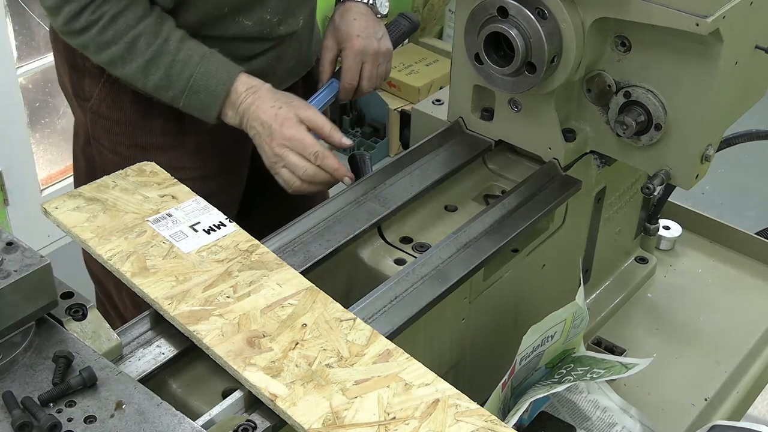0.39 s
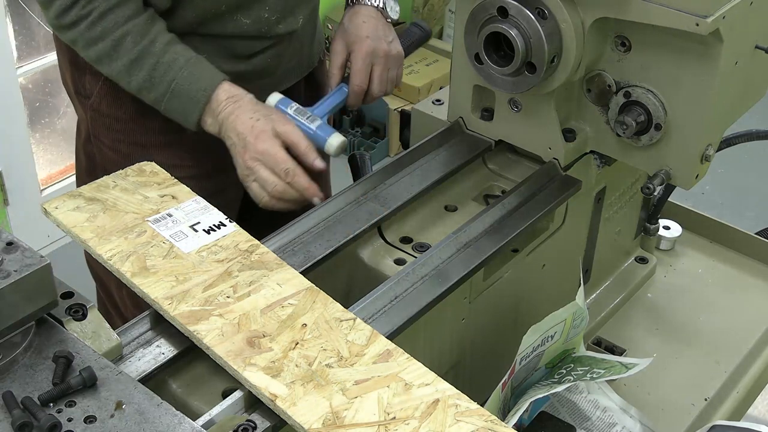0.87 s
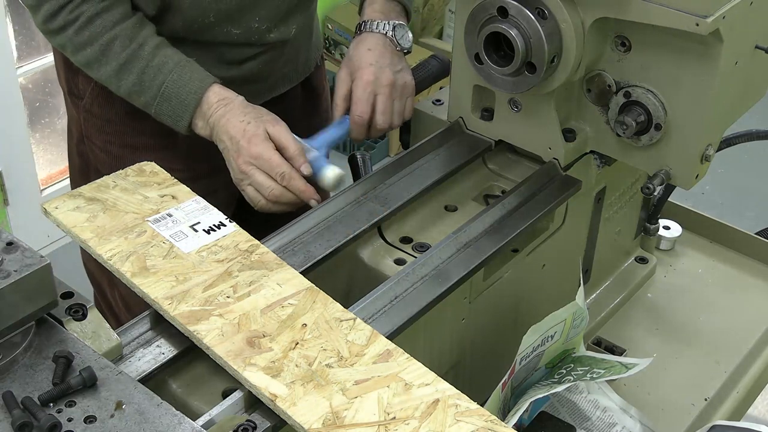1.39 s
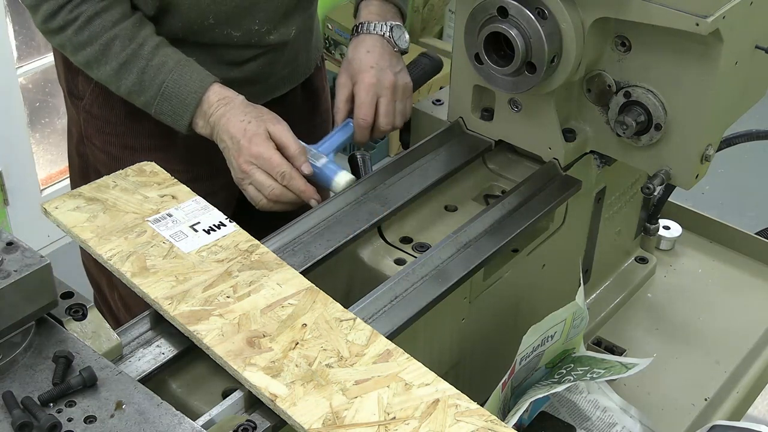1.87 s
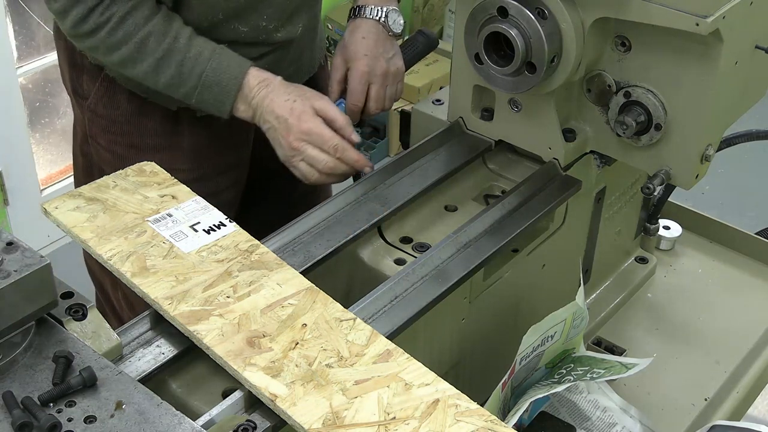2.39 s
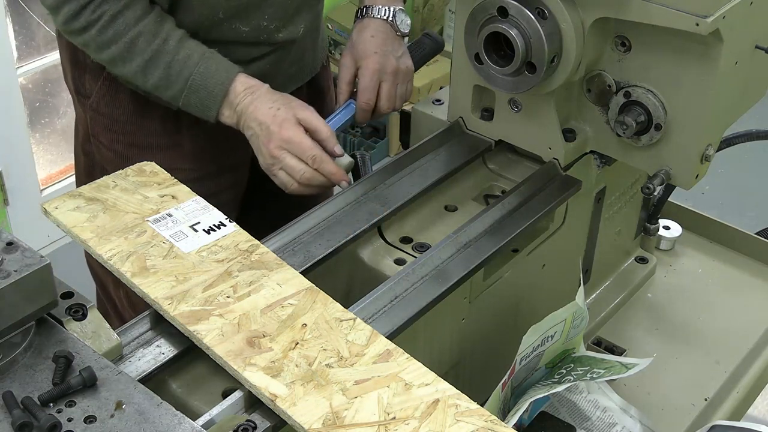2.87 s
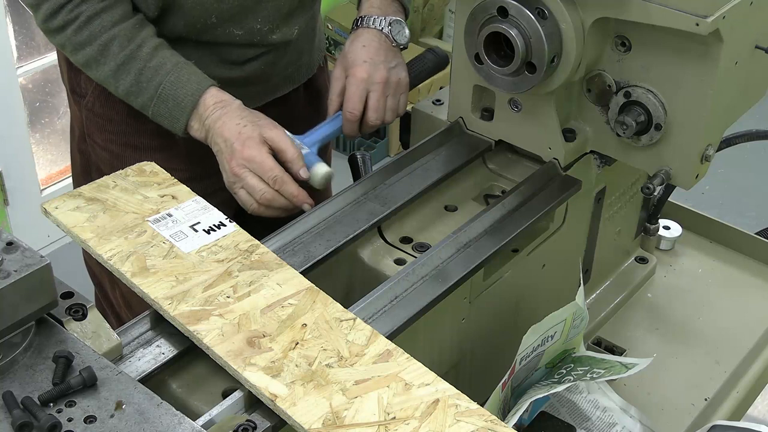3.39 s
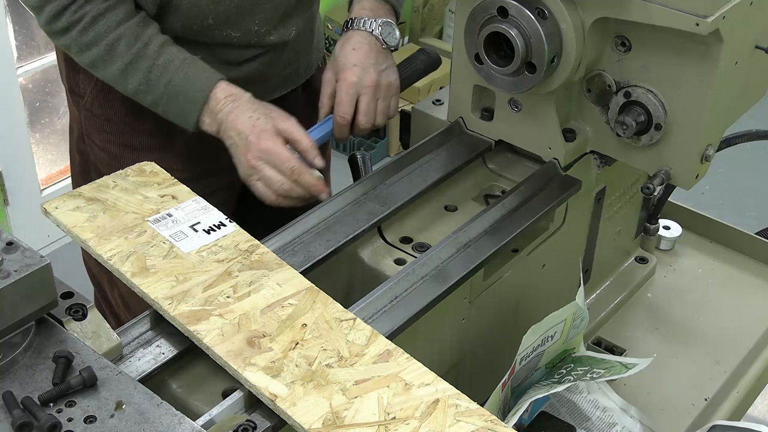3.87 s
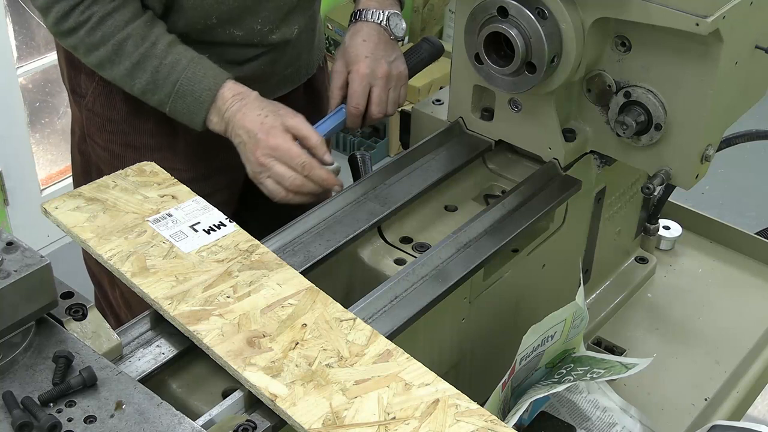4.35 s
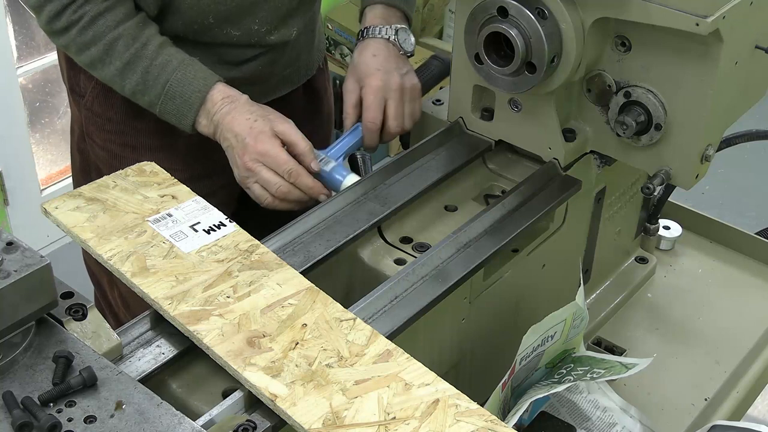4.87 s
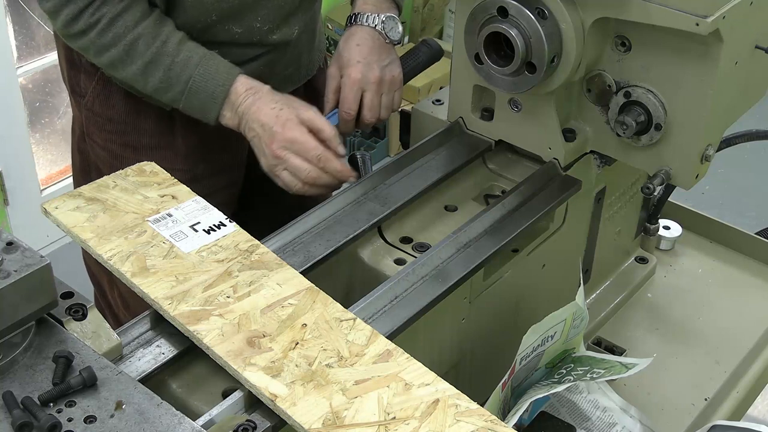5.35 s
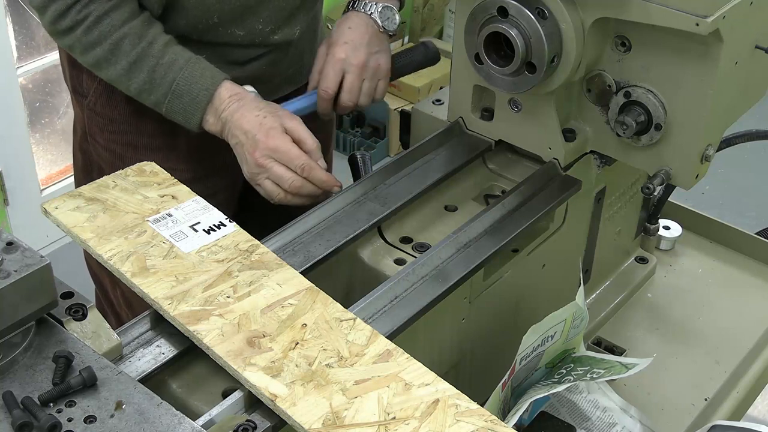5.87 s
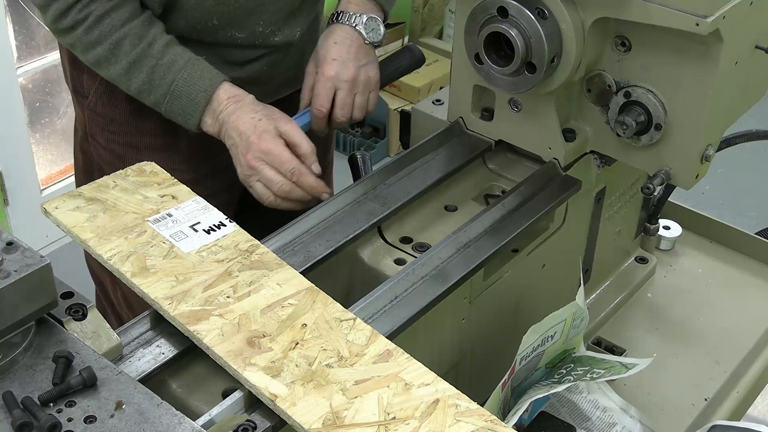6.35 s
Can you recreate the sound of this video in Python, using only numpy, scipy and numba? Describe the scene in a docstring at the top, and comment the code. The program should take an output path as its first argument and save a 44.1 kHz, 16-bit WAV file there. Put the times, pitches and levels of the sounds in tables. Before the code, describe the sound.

A plastic-faced mallet hits a heavy iron machine part five times in a small quiet workshop. After a pause come two quick blows, then three more well spaced ones, each a dull hard knock with a short iron clank and brief room echo. Faint handling ticks fall between them over soft room air and a low wavering hum. Close stereo microphones.

```python
"""Five mallet blows with a plastic face on a heavy iron machine part, in a small, quiet workshop,
heard by a close pair of microphones. Each blow is echoing noise and decaying iron modes, softened by the face;
the camera's limiter holds down the loud blows. Small ticks of handling are enveloped noise.
Behind them lies room air, as coloured noise, with narrow noise bands for a low wavering hum and,
from 388 Hz up, resonances of the room air."""
import sys
import numpy as np
from scipy import signal
from scipy.fft import rfft, irfft
from scipy.io import wavfile
from scipy.ndimage import uniform_filter1d, minimum_filter1d
from numba import njit

SR = 44100
rng = np.random.default_rng(int(sys.argv[2]) if len(sys.argv) > 2 else 0)


def volts(x):
    """Linear amplitude factor 10**(x/20) for a level x in dB, scalar or array-like."""
    e = np.asarray(x, float) / 20
    return 10 ** e


def waveform_to_disk(signal):
    """Save audio, clipped to [-1, 1], as 16-bit WAV at the path in sys.argv[1]."""
    frames = np.transpose(np.atleast_2d(signal))
    scaled = np.clip(frames, -1, 1) * 32767
    samples = np.round(scaled).astype(np.int16)
    wavfile.write(sys.argv[1], SR, samples)


N = 286280
TIME = np.arange(N) / SR


def at(table, hz):
    """Read a (frequency, value) table on a log-frequency axis."""
    f, v = np.transpose(table)
    return np.interp(np.log(np.maximum(hz, 1)), np.log(f), v)


def colour(x, *tables):
    """Shape a spectrum by the sum of (frequency [Hz], level [dB]) tables."""
    hz = np.fft.rfftfreq(x.shape[-1], 1 / SR)
    gain = volts(sum(at(table, hz) for table in tables))
    return irfft(rfft(x) * gain, x.shape[-1])


def unit(x):
    """Scale to rms 1."""
    return x / np.sqrt(np.mean(x ** 2))


def pair(mid, side):
    """Left and right from mid and side."""
    return np.array([mid + side, mid - side])


def add(out, x, s):
    """Mix x into out from second s on."""
    i = int(s * SR)
    out[..., i:i + x.shape[-1]] += x[..., :out.shape[-1] - i]


# mallet blows; the last two columns depend on the spot that is hit, a higher corner is shorter and brighter:
# (time [s], strength [dB], contact corner [Hz], iron ring [dB], lift of the clank [dB])
BLOWS = [(1.527, -4.5, 1610, -13.5, -2.2), (1.83, -2.5, 1730, -12, -3), (3.6718, -2.5, 1880, -11.5, 0.5),
         (4.9312, -0.5, 2280, -14, 1.3), (6.0910, 2.5, 2760, -13.5, -0.5)]
NEW_ECHOES = 0.6  # weight of fresh noise in the echo pattern of each blow
CLANK_HZ = 970


def mallet():
    """Each blow rings the iron and the room; the hands shift, so the echo pattern changes from blow to blow."""
    out = np.zeros((2, N))
    phase = 2 * np.pi * rng.random((2, len(IRON), 1))
    white = rng.standard_normal((2, SR))
    casting = casting_humps()
    for s, strength_db, contact_hz, spot_db, clank_db in BLOWS:
        fresh = rng.standard_normal((2, SR))
        white = np.sqrt(1 - NEW_ECHOES ** 2) * white + NEW_ECHOES * fresh
        source = iron_ring(phase, spot_db) + room_knock(white, casting)
        source[0] += crack()
        # the plastic face pushes for a while instead of clicking: treble falls above the contact corner
        push = signal.butter(2, contact_hz, fs=SR, output="sos")
        knock = signal.sosfilt(push, pair(*source))
        knock += (volts(clank_db) - 1) * signal.lfilter(*signal.iirpeak(CLANK_HZ, 1.3, SR), knock)
        add(out, volts(strength_db) * (knock + stand()), s)
    return out


# modes of the struck iron: (frequency [Hz], relative level [dB], decay by 60 dB [s])
IRON = [(207, -16, .7), (260, -21, .9), (288, -9, .3), (374, -8, .47), (479, -8, .4), (511, -4, .31),
        (538, -5, .35), (563, -3, .42), (600, -3, .26), (630, -5, .31), (686, -7, .42), (759, -7, .38),
        (789, -7, .4), (813, -7, .36), (907, -7, .31), (947, -5, .32), (1034, -3, .25), (1085, -2, .36),
        (1112, -4, .33), (1227, -2, .24), (1305, -4, .26), (1354, -3, .28), (1400, 0, .3), (1418, -1, .28),
        (1558, -6, .25), (1785, -7, .32), (1833, -8, .33), (2038, -9, .33), (2231, -7, .3), (2266, -7, .3)]
IRON_SCATTER_DB, IRON_DETUNE = 3, 0.003  # spread from blow to blow: level, share of the frequency
IRON_WAVER_DB = 3.5  # spread of the steps before they are smoothed


def iron_ring(phase, spot_db):
    """Iron modes as decaying sines, in mid and side."""
    t = TIME[:SR]
    hz, mode_db, t60 = np.transpose(IRON)[:, :, None]
    scatter, detune = rng.standard_normal((2, *hz.shape))
    # echoes interfere with each mode, so its level wavers as it dies
    steps = np.repeat(rng.standard_normal((len(hz), SR // 1050)), 1050, axis=1)
    waver = uniform_filter1d(steps, size=1050)
    ring_db = spot_db + mode_db + IRON_SCATTER_DB * scatter + IRON_WAVER_DB * waver - 60 * t / t60
    sines = np.sin(2 * np.pi * hz * (1 + IRON_DETUNE * detune) * t + phase)
    width = volts([0 * hz, at(KNOCK_SIDE, hz)])
    modes = width * build(hz, t) * volts(ring_db) * sines
    return modes.sum(axis=1)


CRACK_HZ, CRACK_DB, CRACK_T60_S, CRACK_LATE_S = 1980, 1, 0.018, 0.00105  # level before the contact filter


def crack():
    """The face bites: a short bright sine just after the first touch."""
    since = np.maximum(TIME[:SR] - CRACK_LATE_S, 0)
    fade = volts(CRACK_DB - 60 * since / CRACK_T60_S)
    return fade * build(CRACK_HZ, since) * np.sin(2 * np.pi * CRACK_HZ * since)


STAND_HZ, STAND_DB, STAND_S, STAND_LATE_S = 62.9, -54, 0.06, 0.11  # level before the blow's strength


def stand():
    """The machine's stand answers late with a low sway that swells and dies."""
    t = TIME[:SR]
    sway = np.maximum(t - STAND_LATE_S, 0) / STAND_S
    return volts(STAND_DB) * sway ** 2 * np.exp(2 - 2 * sway) * np.sin(2 * np.pi * STAND_HZ * t)


# crowded resonances of the casting: (frequency [Hz], half-width to 1/e [Hz], lift [dB])
HUMPS = [(560, 80, 4), (800, 70, 3), (1070, 70, 4), (1350, 110, 5), (1820, 60, 4), (2040, 50, 3),
         (2300, 70, 3), (2800, 90, 3), (3150, 120, 2), (3600, 220, 2), (3950, 120, 2), (4750, 200, 2),
         (5400, 150, 2)]


def casting_humps():
    """Crowded upper modes merge into broad humps, as a (frequency [Hz], lift [dB]) table."""
    grid = np.geomspace(100, 9000, num=600)
    lift = sum(db * np.exp(-((grid - f) / w) ** 2) for f, w, db in HUMPS)
    return np.transpose([grid, lift])


# colour of the knock in the room: (frequency [Hz], relative level per Hz [dB])
KNOCK = [(30, -42), (60, -50), (100, -42), (150, -22.5), (300, -13), (550, -8), (1000, -7), (1450, -3),
         (1600, -4.5), (2500, -6), (3600, -7), (5500, -13), (8400, -10.5), (9800, -55)]
# side against mid of the knock at the close microphone pair: (frequency [Hz], level [dB])
KNOCK_SIDE = [(60, -41), (180, -35.5), (320, -31.5), (560, -12), (990, -8), (1730, -5), (3040, -6),
              (5320, -3.5), (7500, -10), (9320, -25.5)]


def room_knock(white, casting):
    """The room carries the knock: noise coloured by knock and casting, made into echoes in mid and side."""
    mid = colour(white[0], KNOCK, casting)
    side = colour(white[1], KNOCK, casting, KNOCK_SIDE)
    return echoes(np.array([mid, side]) / mid.std())


# room decay: (frequency [Hz], decay by 60 dB [s])
ROOM_T60 = [(60, 0.43), (150, 0.69), (300, 0.37), (600, 0.32), (1200, 0.29), (2500, 0.26), (5000, 0.26),
            (9000, 0.17)]
# late tail against the early room: (frequency [Hz], level [dB])
LATE = [(200, -7.5), (400, -18), (700, -19.5), (1500, -35.5), (4000, -41)]
LATE_T60_S = 0.86


def echoes(noise):
    """Dense reflections: half-octave bands of noise, each dying at the room's rate."""
    t = TIME[:noise.shape[-1]]
    hz = np.maximum(np.fft.rfftfreq(len(t), 1 / SR), 1)
    spectrum, out = rfft(noise), 0
    for centre in 30 * 2 ** np.arange(0, 9, 0.5):
        share = np.clip(1 - 2 * np.abs(np.log2(hz / centre)), 0, 1)
        band = irfft(spectrum * share, len(t))
        early = volts(-60 * t / at(ROOM_T60, centre))
        # a weaker, slower tail comes back from the far end of the shop
        late = volts(at(LATE, centre) - 60 * t / LATE_T60_S)
        out = out + band * build(centre, t) * (early + late)
    return out


# bass and scattered treble build up later than the middle: (frequency [Hz], time constant [s])
ROOM_BUILD = [(100, 0.014), (400, 0.00064), (900, 0.0017), (2000, 0.00095), (3500, 0.0021), (6000, 0.0023)]


def build(hz, t):
    """How sound at a frequency swells in after the contact."""
    return (1 - np.exp(-t / at(ROOM_BUILD, hz))) ** 3


# small ticks of handling: (time [s], level before rise and decay [dB rms], low body against bright part [dB])
TICKS = [(1.1613, -68.5, -24), (2.2937, -52.5, -1.5), (2.6194, -55.5, 2), (2.8729, -52.5, 3.5),
         (3.5813, -60.5, -55), (4.0537, -52.5, -10), (4.4894, -58, -4.5), (5.2495, -53.5, 2),
         (5.6451, -51, 0.5)]
TICK_T60_S, TICK_RISE_S = 0.22, 0.0016


def ticks():
    """Faint broad scuffs: noise with a bright part and, in most, a low body, a quick rise and a short tail."""
    out, t = np.zeros((2, N)), TIME[:SR // 4]
    # (frequency [Hz], relative level [dB])
    bright_shape = [(700, 1), (1800, 14), (4000, 9.5), (7000, 2.5), (9000, -44.0)]
    body_shape = [(150, -37), (500, 36.5), (1200, 21), (2500, -0.5)]
    for s, level_db, body_db in TICKS:
        bright, body, side = rng.standard_normal((3, len(t)))
        bright, side = unit(colour(bright, bright_shape)), unit(colour(side, bright_shape))
        body = unit(colour(body, body_shape))
        swell = volts(level_db - 60 * t / TICK_T60_S) * (1 - np.exp(-t / TICK_RISE_S))
        add(out, swell * pair(bright + volts(body_db) * body, 0.5 * side), s)
    return out


# colour of the room air: (frequency [Hz], relative level per Hz [dB])
AIR = [(15, -81), (25, -60), (48, -10.5), (112, -8.5), (140, -2.5), (171, -11), (199, -10), (237, -9),
       (289, -6.5), (526, -5), (746, -8), (958, -8), (8200, -30), (9060, -31.5), (9770, -67.5),
       (12700, -57.5), (21500, -120)]
# side against mid of the air at the close microphone pair: (frequency [Hz], level [dB])
AIR_SIDE = [(60, -53), (110, -35), (180, -36), (320, -25.5), (560, -11), (990, -4), (1730, -2.5),
            (3040, -4), (5320, -3.5), (9320, -6)]
# level of the air before its slow swells: (time [s], level of the mid [dB rms])
AIR_LEVEL = [(0, -51), (1.4, -53), (3.5, -53.5), (5.5, -53), (6.49, -52.5)]
# split between rumble and hiss: (frequency [Hz], share of rumble [0..1])
AIR_SPLIT = [(500, 1), (1200, 0)]
# spread of the swells and time between their turning points
HISS_SWELL_DB, HISS_HOLD_S = 1, 0.315
RUMBLE_SWELL_DB, RUMBLE_HOLD_S = 2.5, 0.1


def air():
    """Room noise: smooth hiss and uneven rumble; the bass is nearly alike left and right."""
    mid, side = rng.standard_normal((2, N))
    mid, side = colour(mid, AIR), colour(side, AIR, AIR_SIDE)
    noise = pair(mid, side) / mid.std()
    rumble = irfft(rfft(noise) * at(AIR_SPLIT, np.fft.rfftfreq(N, 1 / SR)), N)
    hiss = noise - rumble
    out = swells(hiss, HISS_SWELL_DB, HISS_HOLD_S) + swells(rumble, RUMBLE_SWELL_DB, RUMBLE_HOLD_S)
    return out * volts(np.interp(TIME, *np.transpose(AIR_LEVEL)))


def swells(part, swell_db, hold_s):
    """Let a level wander in straight lines between random points."""
    points = np.arange(0, 8, hold_s)
    return part * volts(swell_db * np.interp(TIME, points, rng.standard_normal(len(points))))


# narrow bands in the room noise: low wavering hum and, from 388 Hz up, room air resonances:
# (frequency [Hz], level [dB rms], half-width to 1/e [Hz])
NARROW_BANDS = [(151.7, -69, 7.2), (201.8, -62, 13.2), (388, -67, 9.2), (528.4, -67, 12), (702, -67.5, 15)]


def hum_and_resonances():
    """Low wavering hum and room air resonances: narrow bands of noise, alike left and right."""
    hz, out = np.fft.rfftfreq(N, 1 / SR), 0
    for centre_hz, level_db, width_hz in NARROW_BANDS:
        shape = np.exp(-((hz - centre_hz) / width_hz) ** 2)
        band = irfft(rfft(rng.standard_normal(N)) * shape, N)
        out = out + volts(level_db) * unit(band)
    return out


def scene():
    """Blows, ticks, and the air with its hum and resonances."""
    return mallet() + ticks() + air() + hum_and_resonances()


@njit
def limiter(x, top, attack, release):
    """Gain that follows the peaks: drops fast above the ceiling, comes back slower."""
    gain, e = np.empty(len(x)), 0.
    for i in range(len(x)):
        e += (x[i] - e) * (attack if x[i] > e else release)
        gain[i] = top / max(e, top)
    return gain


LIMIT_DB, LIMIT_ATTACK_S, LIMIT_RELEASE_S, LIMIT_SMOOTH_S = -6, 0.00049, 0.015, 0.0005
PEAK = 0.9  # full-scale share that the rounding approaches


def top_cut(x):
    """Nothing passes above the cut-off."""
    return signal.sosfilt(signal.butter(12, 9920, fs=SR, output="sos"), x)


def record(dry):
    """One limiter rides both channels, reacting just ahead of a peak; what slips through is rounded."""
    loudest = np.abs(dry).max(axis=0)
    gain = limiter(loudest, volts(LIMIT_DB), 1 / (LIMIT_ATTACK_S * SR), 1 / (LIMIT_RELEASE_S * SR))
    ahead = int(LIMIT_SMOOTH_S * SR)
    smooth_gain = uniform_filter1d(minimum_filter1d(gain, ahead), ahead)
    held = dry * smooth_gain / PEAK
    mix = PEAK * held / (1 + held ** 4) ** (1 / 4)
    return top_cut(mix)


dry = scene()
out = record(dry)
waveform_to_disk(out)
```